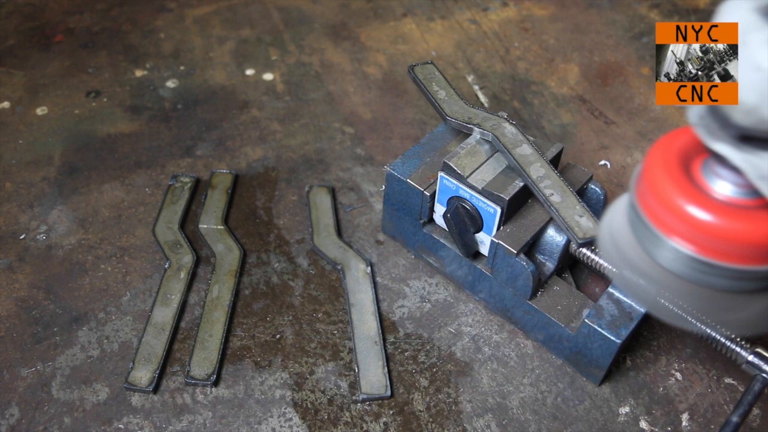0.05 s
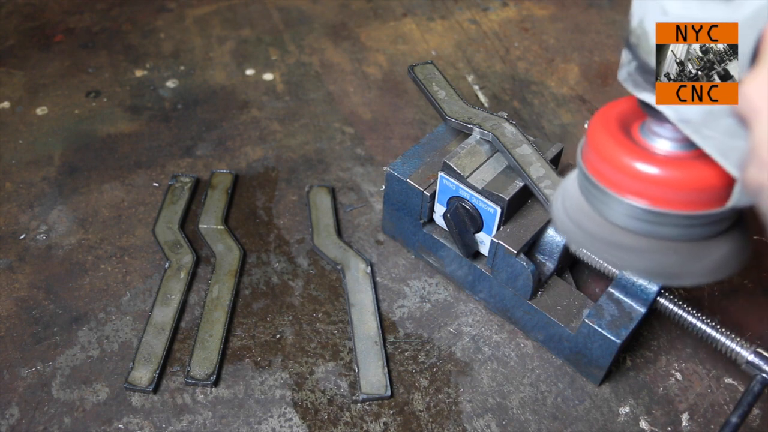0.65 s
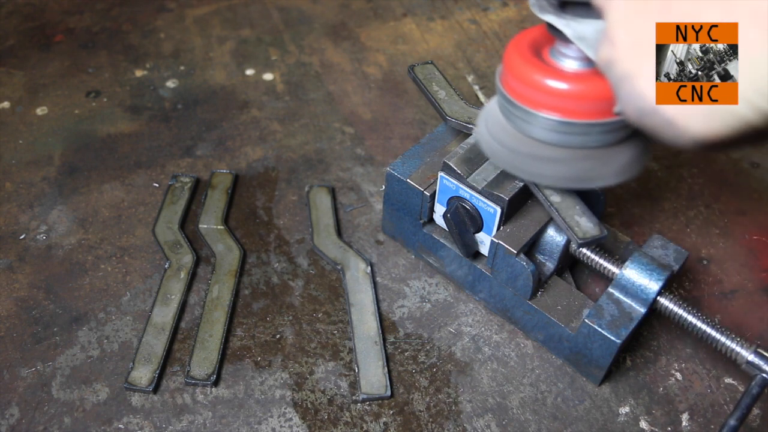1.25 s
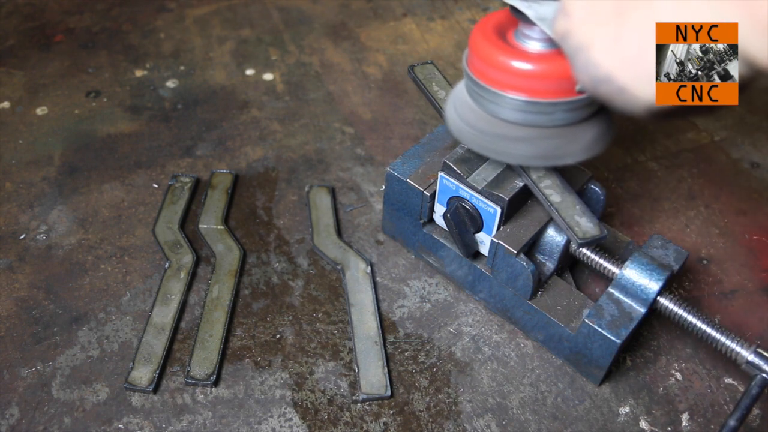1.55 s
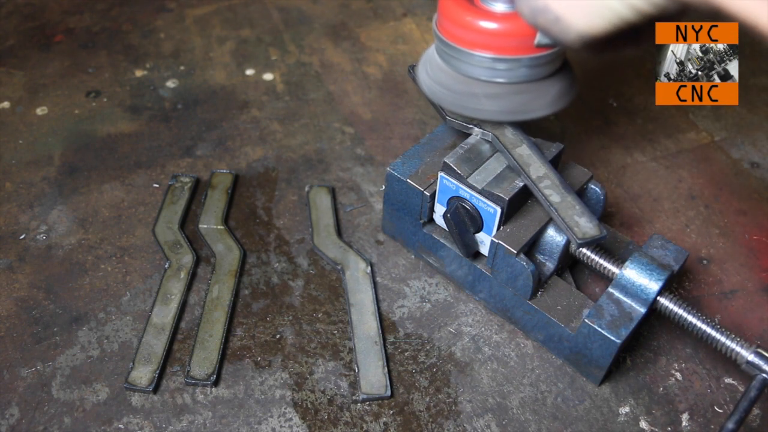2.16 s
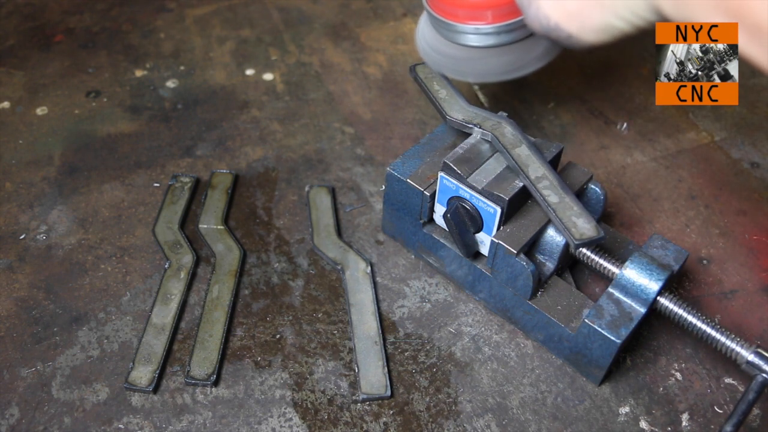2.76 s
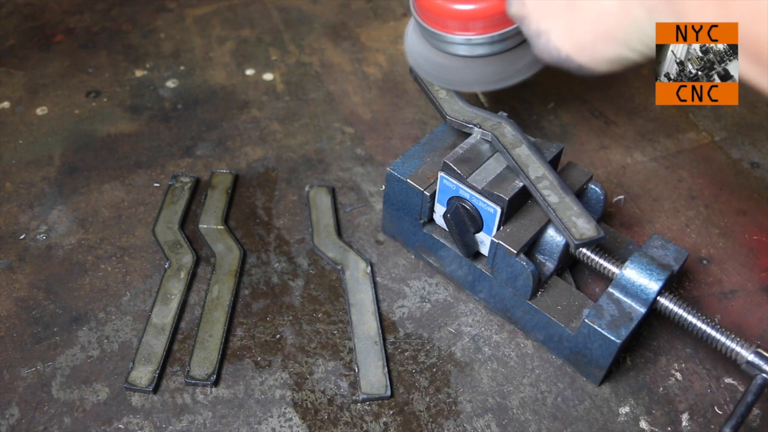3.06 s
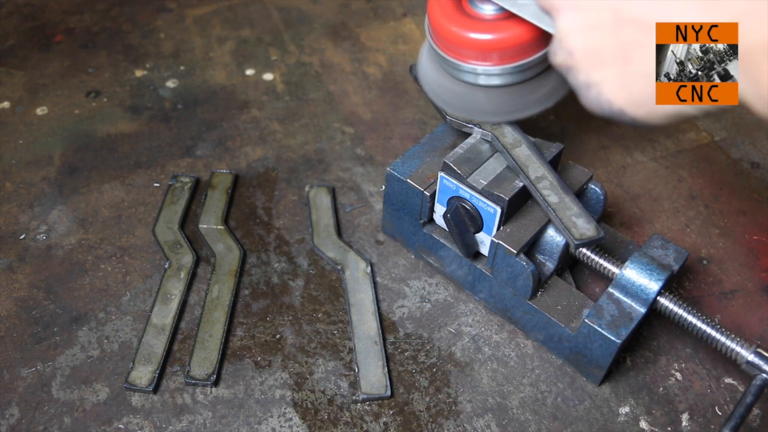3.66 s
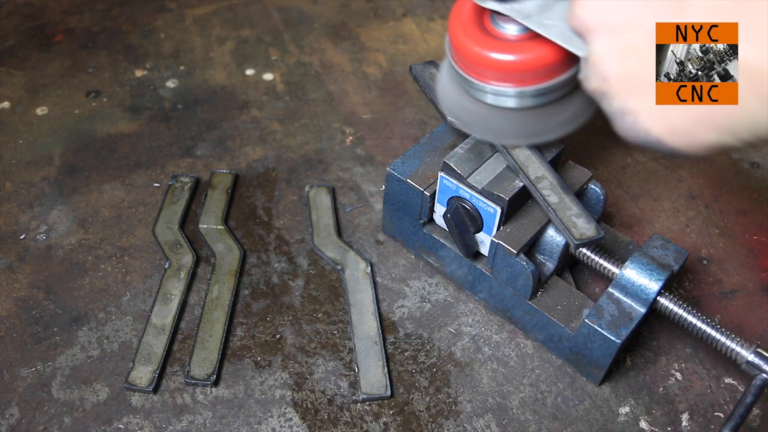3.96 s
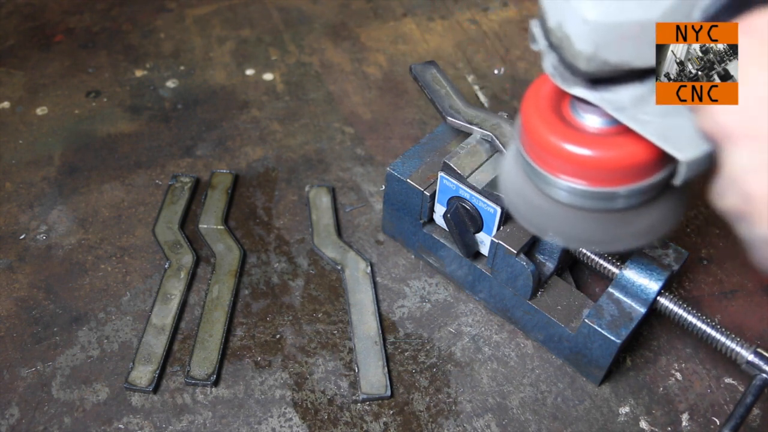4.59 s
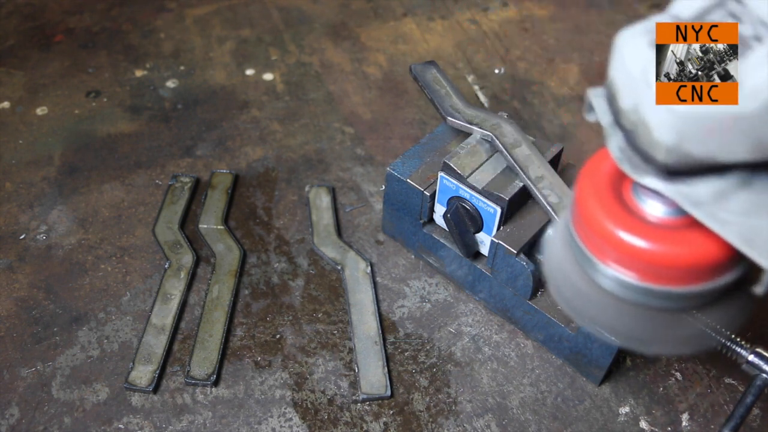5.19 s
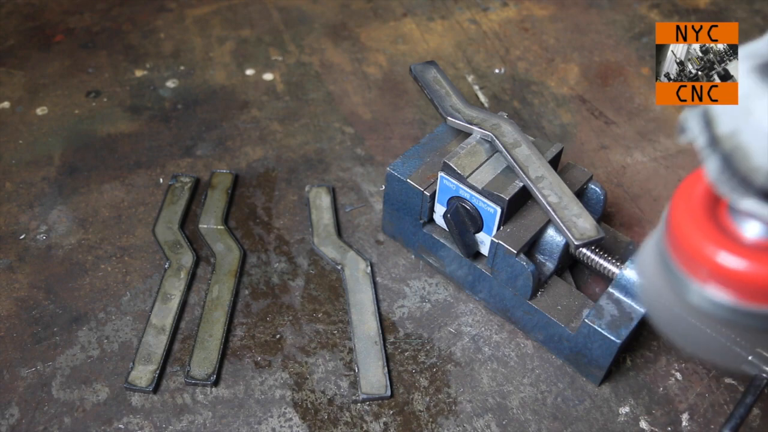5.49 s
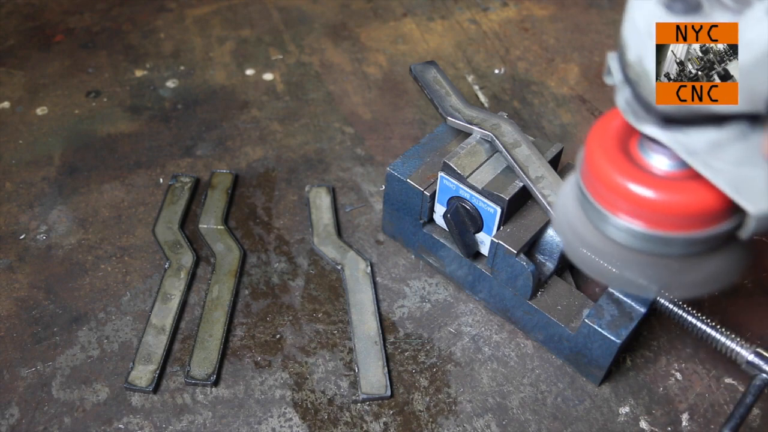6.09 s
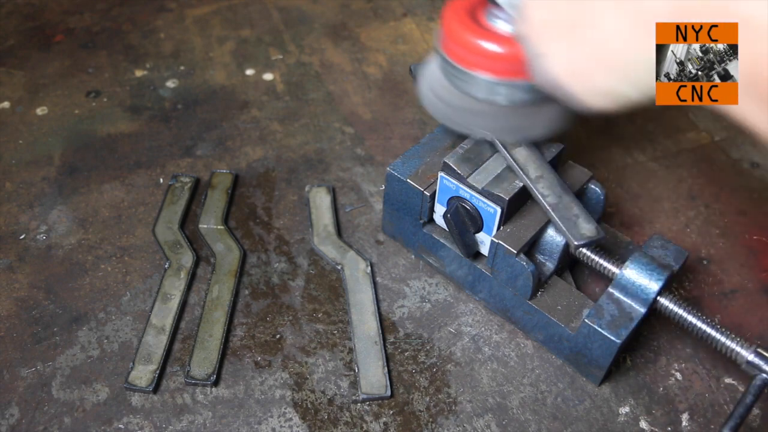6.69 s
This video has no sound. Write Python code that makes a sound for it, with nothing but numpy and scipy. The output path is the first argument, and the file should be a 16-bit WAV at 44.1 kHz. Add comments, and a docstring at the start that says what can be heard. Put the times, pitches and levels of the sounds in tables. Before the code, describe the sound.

An angle grinder with a wire cup wheel runs without stopping, close to the microphone over a workshop bench. Its motor whines over a coarse gear rattle and fan hiss, while the wires scratch and ring along a steel bar in several passes. The pitch starts low under load, recovers, then rises slightly whenever the pressure eases. Cooling air softly buffets the microphone near the middle and at the end.

```python
"""Angle grinder wire-brushing steel.

A wire cup wheel sweeps along a bar in a vice, close to one microphone over the bench.
Armature and spindle hum, the bevel gears rattle in their play and ring the gear head, the fan hisses.
The wires scratch and sing where they bite; cooling air now and then blows across the microphone."""
import sys
import numpy as np
from scipy import signal
from scipy.fft import rfft, irfft
from scipy.io import wavfile
from scipy.ndimage import uniform_filter1d, map_coordinates

SR = 44100
rng = np.random.default_rng(int(sys.argv[2]) if len(sys.argv) > 2 else 0)


def store_pcm(level_fs):
    """Save levels as 16-bit WAV."""
    pcm = np.round(np.clip(level_fs, -1, 1) * 32767).astype(np.int16)
    wavfile.write(sys.argv[1], SR, np.atleast_2d(pcm).T)


N = 306054
TIME_S = np.arange(N) / SR
FREQS_HZ = np.maximum(np.arange(2049) * SR / 4096, 1)
GEAR_RATIO = 9 / 31  # spindle turns per armature turn

# Air buffeting the microphone: freq_hz, density_db
BUFFET_SPECTRUM = [(15, -14), (35, -8), (70, -2), (130, -4), (220, -14), (400, -16), (1500, -47)]
# Cooling-air gusts: start_s, length_s, start_db, end_db
GUSTS = [(2.59, .65, -47.5, -66), (4.62, .38, -67, -61), (6.54, .45, -58, -56)]
# Echoes off vice, bench and walls: near_delay_ms, far_delay_ms, gain_db
ECHOES = [(1.565, 1.61, -36), (3.09, 2.4, -25.5), (4.344, 5.1, -18.5), (7.32, 6.8, -25.5),
          (10.98, 11.5, -19.5), (17.13, 16.8, -24), (26.06, 26.3, -18.5)]
# Tool position on the bar: time_s, reach (0 near end, 1 far end)
TOOL_PATH = [(0, 0.46), (.5, .28), (1.2, 0.38), (2.45, 0.75), (2.75, 1), (3.9, 0.97), (4.5, 0.46),
             (5, 0.38), (5.5, 0.038), (6.1, 0.022), (6.5, 0.58), (6.94, 0.77)]
# Armature speed, sagging under load: time_s, speed_hz
ARMATURE_SPEED = [(0.02, 495.6), (0.19, 518.5), (0.3, 528.3), (0.46, 541.3), (0.81, 542.7), (1.4, 541.5),
                  (1.46, 540.4), (2.37, 539.2), (3.03, 557.3), (4.02, 551), (4.24, 543.6), (4.49, 538.5),
                  (5.4, 544.1), (6.0, 569.1), (6.82, 549.6)]
# Armature hum: time_s, level_db
ARMATURE_LEVELS = [(0.0, -41.5), (1.33, -44.5), (1.93, -43), (3.03, -44.5), (4.68, -43.5), (4.85, -44.5),
                   (6.94, -41.5)]
# Armature harmonics: order, relative_db
ARMATURE_ORDERS = [(1, 0), (2, -26), (3, -18), (4, -25)]
# Spindle and gear-mesh harmonics: order (rounded in use), loaded_db, free_db
SPINDLE_ORDERS = [(1, -56, -54), (2, -66.5, -61), (2.98, -57.5, -54.5), (4, -56, -51.5), (5, -56.5, -56),
                  (6, -69, -57.5), (7, -65, -69), (9, -81, -63), (10, -64, -58.5), (12, -58.5, -58),
                  (16, -67, -54.5), (22, -59, -52), (28, -63, -65), (31.2, -61, -61)]
# Fan and vent resonances: freq_hz, width_hz, near_db, far_db
VENT_MODES = [(3160, 2050, 3.5, 1), (6480, 1500, -1, 0.5), (7990, 1860, 2.5, -0.5), (9660, 2060, 2.5, -2),
              (11140, 1300, -2, -6), (12600, 1100, -5.5, -5), (13800, 1300, -7, -8),
              (15300, 2100, -12, -11.5)]
# Air rushing through the motor body: freq_hz, density_db
RUSH_SPECTRUM = [(20, -40), (50, -23.5), (100, -16), (190, -13.5), (270, -5.5), (400, -4.5), (560, 2),
                 (720, 1.5), (1000, -1), (1400, -2.5), (1750, -0.5), (3000, -4), (8000, -54)]
# Gear rattle and fan hiss: time_s, low_rattle_db, high_rattle_db, hiss_db
RASP_LEVELS = [(0.05, -36.5, -36, -36.5), (0.07, -37, -35.5, -38), (0.66, -36.5, -35.5, -40),
               (1.52, -38.5, -39.5, -40.5), (1.65, -36, -39, -39), (2.24, -35.5, -38.5, -38.5),
               (2.68, -34.5, -38, -39.5), (3.96, -34, -39, -40), (4.32, -34.5, -42.5, -39),
               (5.09, -34.5, -40.5, -39.5), (5.79, -36.5, -36.5, -39.5), (6.67, -35, -40.5, -40),
               (6.82, -34, -36.5, -40), (6.9, -37, -37, -40.5)]
# Hardest gear knocks: time_s, energy_db (re one sample of tooth chatter)
GEAR_KNOCKS = [(0.2763, 28), (0.5414, 32.5), (0.7366, 29), (1.3164, 30), (3.5289, 29), (4.7446, 29),
               (4.7555, 31), (5.449, 31)]
# Gear-head resonances: freq_hz, width_hz, near_db, far_db
GEAR_HEAD_MODES = [(2046, 750, -11, -13), (2610, 470, -3.5, -3), (3370, 850, -1, -1.5),
                   (3820, 740, -3, -0.5), (4480, 1200, 0.5, -23), (5040, 620, 5, -0.5),
                   (5420, 690, -8.5, 0), (6400, 1500, -6.5, -7.5), (9100, 4400, -16, -14)]
# Wires biting the steel: start_s, length_s, strength_db
WIRE_BITES = [(.2, 1.39, 1.5), (1.6, 0.81, 0.5), (2.7, 1.4, 2), (4.9, 0.61, -9), (5.55, .85, -4),
              (6.4, 0.34, -7)]
# Scrape of wires digging in: freq_hz, width_hz, full_drag_db
SCRAPE_BANDS = [(805, 1200, -41.5), (1150, 220, -54), (1960, 400, -38.5), (4500, 1000, -41)]
# Rings of bar and wires: freq_hz, width_hz, level_db, loudest_reach, random_share (0-1)
STEEL_RINGS = [(1114, 200, -52.5, .25, 0.8), (3740, 653, -46, .5, 0.6), (5030, 150, -51.5, 1, 0.9),
               (5080, 130, -44.5, 0.07, .6), (5250, 340, -45, 0.25, 0.5), (5440, 140, -43.5, 0.69, .03),
               (6050, 180, -47.5, 0.65, 0.03), (7990, 610, -44, 0.03, .7), (9150, 1100, -42.5, 0.27, .6),
               (10050, 630, -46.5, 0.77, .1), (10930, 600, -45, 0.12, .73), (13300, 500, -61, 0.3, .6),
               (14050, 600, -60, 0, .7), (15650, 400, -57, 0.8, .3)]


def undb(db):
    """Decibels to gain."""
    return 10 ** (np.asarray(db) / 20)


def unit(x):
    """Scale to rms 1."""
    return x / np.sqrt(np.mean(x ** 2))


def curves(table):
    """Table columns, interpolated linearly in time."""
    times_s, *columns = np.transpose(table)
    return [np.interp(TIME_S, times_s, column) for column in columns]


def gate(start_s, length_s, attack_s, release_s):
    """Trapezoid envelope; the release follows length_s."""
    rise = (TIME_S - start_s) / attack_s
    fall = 1 + (start_s + length_s - TIME_S) / release_s
    return np.clip(np.minimum(rise, fall), 0, 1)


def wander(rate_hz):
    """Smooth random curve, spread near 1."""
    hold = max(int(SR / rate_hz), 2)
    steps = np.repeat(rng.standard_normal(N // hold + 1), hold)
    return 1.2 * uniform_filter1d(steps, hold)[:N]


def steady(x, window_samples=9000):
    """Hold the slow level at rms 1, keeping the fast grain."""
    return x / np.sqrt(uniform_filter1d(x ** 2, window_samples) + 1e-12)


def lowpass(x, cutoff_hz):
    """Zero-phase low-pass."""
    return signal.sosfiltfilt(signal.butter(4, cutoff_hz, fs=SR, output="sos"), x)


def shape(x, gain):
    """Minimum-phase filter with the given gain at FREQS_HZ."""
    cepstrum = irfft(np.log(gain + 1e-6))
    half = len(cepstrum) // 2
    fold = np.r_[1, np.full(half - 1, 2), 1, np.zeros(half - 1)]
    impulse_response = irfft(np.exp(rfft(cepstrum * fold)))
    return signal.oaconvolve(x, impulse_response)[:N]


def noise(spectrum):
    """Noise at rms 1, shaped by (freq_hz, density_db) points."""
    hz, db = np.transpose(spectrum)
    gain = undb(np.interp(np.log(FREQS_HZ), np.log(hz), db))
    return unit(shape(rng.standard_normal(N), gain))


def peak(hz, width_hz):
    """Gain curve of a steep-sided resonance."""
    return 1 / (1 + ((FREQS_HZ ** 2 - hz ** 2) / (FREQS_HZ * width_hz)) ** 2)


def radiate(x, modes, reach):
    """Ring resonances whose balance shifts as the tool travels."""
    near = np.sqrt(sum((undb(db) * peak(hz, width_hz)) ** 2 for hz, width_hz, db, _ in modes))
    far = np.sqrt(sum((undb(db) * peak(hz, width_hz)) ** 2 for hz, width_hz, _, db in modes))
    return (1 - reach) * shape(x, near) + reach * shape(x, far)


def draught(calm_db=-85, flutter_db=2.5):
    """Cooling air buffets the microphone in uneven gusts."""
    flow = undb(calm_db)
    for start_s, length_s, start_db, end_db in GUSTS:
        db = np.interp(TIME_S, [start_s, start_s + length_s], [start_db, end_db])
        flow = flow + undb(db) * gate(start_s, length_s, attack_s=0.028, release_s=0.072)
    return noise(BUFFET_SPECTRUM) * flow * undb(flutter_db * wander(25))


def winding_buzz(pitch_hz=240, level_db=-71):
    """Field windings buzz at a mains harmonic."""
    return np.sqrt(2) * undb(level_db) * np.sin(2 * np.pi * pitch_hz * TIME_S)


def workshop(x, reach, oversample=4):
    """Early echoes comb the sound; their paths change as the tool travels."""
    upsampled = signal.resample_poly(x, oversample, 1)
    out = x.copy()
    for near_ms, far_ms, db in ECHOES:
        delay_s = (near_ms + reach * (far_ms - near_ms)) / 1000
        out += undb(db) * map_coordinates(upsampled, [(TIME_S - delay_s) * SR * oversample], order=1)
    return out


def fan(reach, hiss_db, hiss_trim_db=1.24, rush_db=-46, flicker_db=0.5):
    """The fan drives air through the motor and out of the vents."""
    turbulence = rng.standard_normal(N) * undb(flicker_db * wander(300))
    hiss = steady(radiate(turbulence, VENT_MODES, reach))
    rush = noise(RUSH_SPECTRUM) * undb(rush_db + flicker_db * wander(12))
    return hiss * undb(hiss_db + hiss_trim_db) + rush


def shaft_hum(turns, armature_db, free, armature_trim_db=-0.2, waver_db=2, jitter_rad=0.005):
    """Unbalanced armature and spindle hum; higher spindle orders waver with the tooth play."""
    armature = sum(undb(db) * np.sin(2 * np.pi * (round(order) * turns / GEAR_RATIO + rng.random()))
                   for order, db in ARMATURE_ORDERS)
    out = armature * undb(armature_db + armature_trim_db)
    for order, loaded_db, free_db in SPINDLE_ORDERS:
        db = loaded_db + free * (free_db - loaded_db) + waver_db * min(order / 4, 1) * wander(14)
        phase_rad = 2 * np.pi * (round(order) * turns + rng.random())
        out += undb(db) * np.sin(phase_rad + jitter_rad * order * wander(90))
    return np.sqrt(2) * out


def tooth_burst(start_s, rise_s, size=800):
    """Brief cluster of tooth impacts: sample indices and values, energy 1."""
    age = np.arange(size) / SR / rise_s
    hits = rng.standard_normal(size) * age * np.exp(-age ** 2 / 2)
    indices = np.clip(int(start_s * SR) + np.arange(size), 0, N - 1)
    return indices, hits / np.linalg.norm(hits)


def gear_force(turns, free, bounce_db=29, free_offset_db=-2, slap_db=11, slaps_per_s=120):
    """The heavy wheel bounces in the gear play; between bounces the teeth chatter and slap."""
    force = rng.standard_normal(N)
    spacings, strengths, lengths = rng.standard_normal((600, 3)).T
    bounce_turns = np.cumsum(3.8 * np.exp(0.17 * spacings))
    for turn, strength, length in zip(bounce_turns, strengths, lengths):
        if turn < turns[-1]:
            stretch = np.exp(0.44 * np.tanh(length))
            start_s = np.interp(turn, turns, TIME_S)
            indices, hits = tooth_burst(start_s, rise_s=0.0027 * stretch)
            db = bounce_db + free_offset_db * free[int(start_s * SR)] + np.tanh(strength)
            force[indices] += undb(db) * np.sqrt(stretch) * hits  # longer contact, more energy
    force += (rng.random(N) < slaps_per_s / SR) * undb(slap_db)
    # both shafts run slightly out of true
    force *= 1 + 0.19 * np.cos(2 * np.pi * turns) + 0.18 * np.cos(2 * np.pi * turns / GEAR_RATIO)
    for start_s, db in GEAR_KNOCKS:
        indices, hits = tooth_burst(start_s, rise_s=0.0012)
        force[indices] += undb(db) * hits
    return unit(force)


def gear_rattle(force, reach, low_db, high_db, low_trim_db=-1.18, high_trim_db=-2, split_hz=4150):
    """Tooth impacts and sliding ring the gear head; low and high bands swell separately."""
    sliding = undb(-7) * rng.standard_normal(N)
    low = lowpass(radiate(force + sliding, GEAR_HEAD_MODES, reach), split_hz)
    head = radiate(force, GEAR_HEAD_MODES, reach)
    high = head - lowpass(head, split_hz)
    return undb(low_db + low_trim_db) * steady(low) + undb(high_db + high_trim_db) * steady(high)


def wires(turns, force, reach, drag, fade_s=0.21, reach_spread=0.098, flicker_db=1.6, split_hz=6000):
    """The same wire tips strike each turn, loose ones at random; tool position picks the rings."""
    size = 2048  # points per turn
    tips = irfft(np.exp(2j * np.pi * rng.random(size // 16)), size)
    regular = unit(np.interp(turns % 1, np.arange(size) / size, tips))
    # wheel bounce drives the lows; the finest scratching runs evenly
    fine = rng.standard_normal(N)
    loose = lowpass(force, split_hz) + fine - lowpass(fine, split_hz)
    contact = sum(undb(db) * gate(start_s - fade_s / 2, length_s, fade_s, fade_s)
                  for start_s, length_s, db in WIRE_BITES)
    out = drag * sum(undb(db) * unit(shape(loose, peak(hz, width_hz)))
                     for hz, width_hz, db in SCRAPE_BANDS)
    for hz, width_hz, db, loudest_reach, random_share in STEEL_RINGS:
        scratch = np.sqrt(1 - random_share) * regular + np.sqrt(random_share) * loose
        ring = unit(shape(scratch, peak(hz, width_hz)))
        nearness = np.exp(-0.5 * ((reach - loudest_reach) / reach_spread) ** 2)
        out += undb(db + flicker_db * wander(14)) * contact * nearness * ring
    return out


def scene(loaded_hz=542, free_hz=563, drag_sag_hz=45.4, rasp_trim_db=-0.19):
    """One spindle angle drives hum, rattle and wires; motor speed indicates the load."""
    armature_hz, = curves(ARMATURE_SPEED)
    armature_db, = curves(ARMATURE_LEVELS)
    low_db, high_db, hiss_db = curves(RASP_LEVELS)
    reach, = curves(TOOL_PATH)
    free = np.clip((armature_hz - loaded_hz) / (free_hz - loaded_hz), 0, 1)
    drag = np.clip((loaded_hz - armature_hz) / drag_sag_hz, 0, 1)
    turns = np.cumsum(armature_hz * GEAR_RATIO) / SR
    force = gear_force(turns, free)
    rasp = gear_rattle(force, reach, low_db, high_db) + fan(reach, hiss_db)
    rasp += wires(turns, force, reach, drag)
    hum = shaft_hum(turns, armature_db, free) + winding_buzz()
    return (hum + undb(rasp_trim_db) * workshop(rasp, reach) + draught())[None]


def record(dry, cutoff_hz=15700):
    """Steep treble cut."""
    return signal.sosfilt(signal.ellip(12, 0.1, 80, cutoff_hz, fs=SR, output="sos"), dry)


dry = scene()
out = record(dry)
store_pcm(out)
```